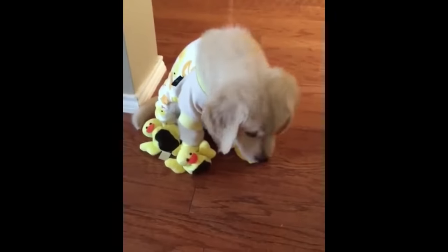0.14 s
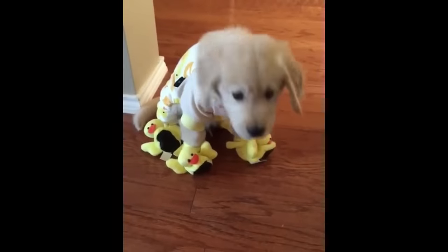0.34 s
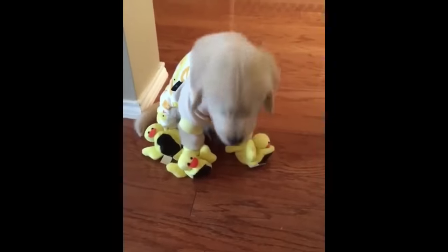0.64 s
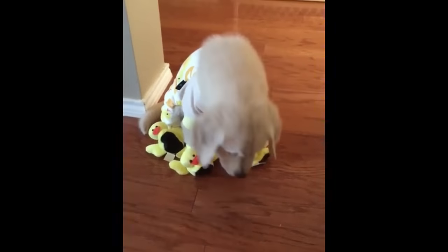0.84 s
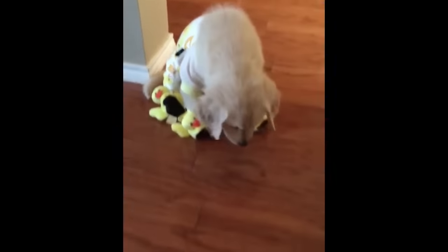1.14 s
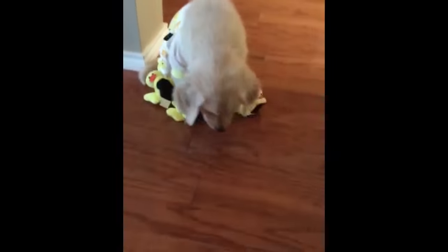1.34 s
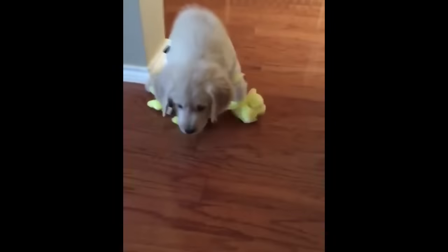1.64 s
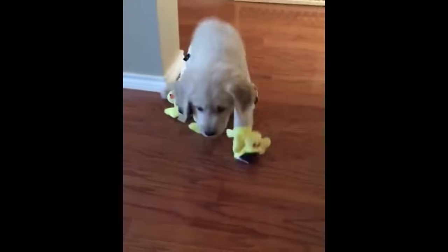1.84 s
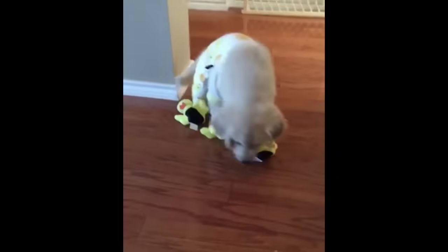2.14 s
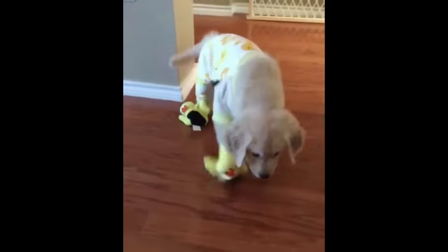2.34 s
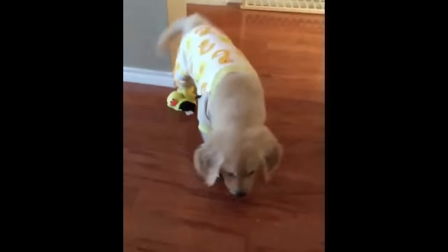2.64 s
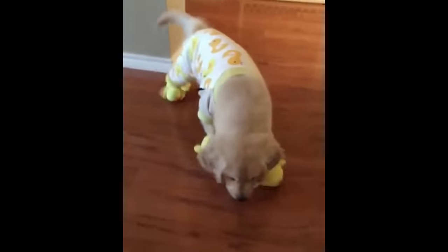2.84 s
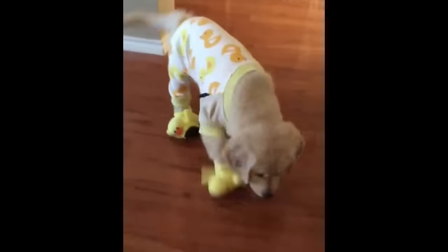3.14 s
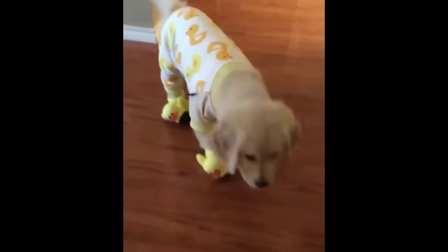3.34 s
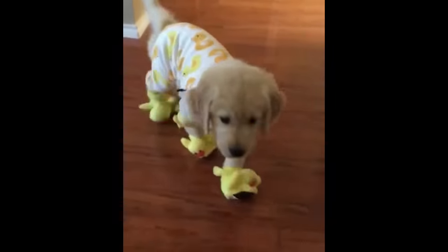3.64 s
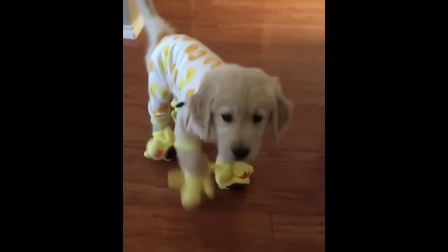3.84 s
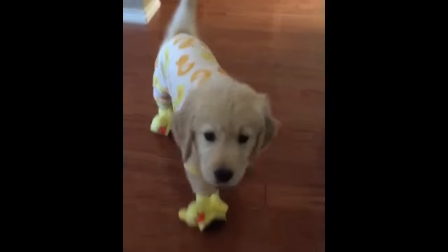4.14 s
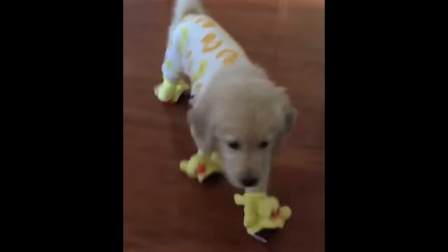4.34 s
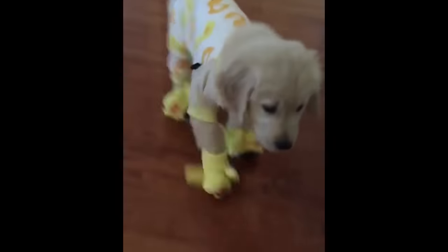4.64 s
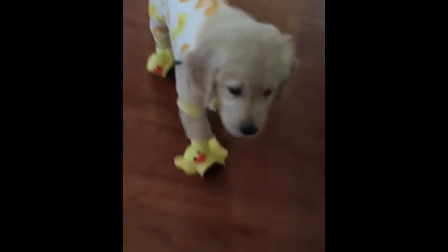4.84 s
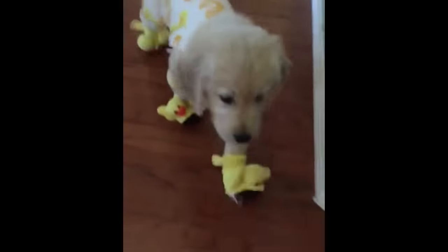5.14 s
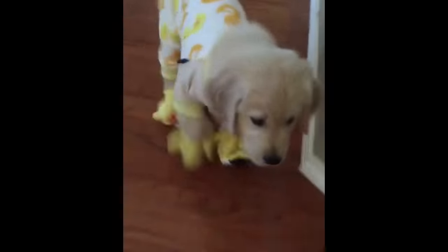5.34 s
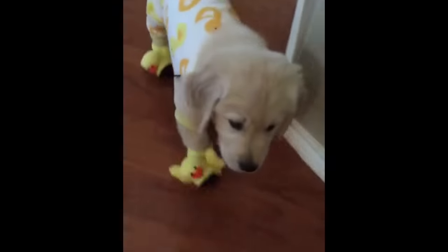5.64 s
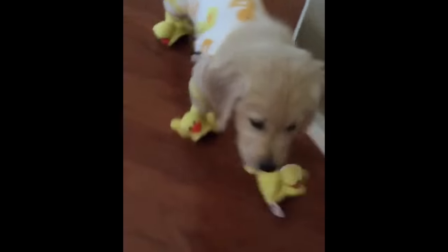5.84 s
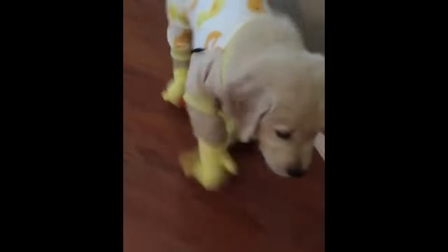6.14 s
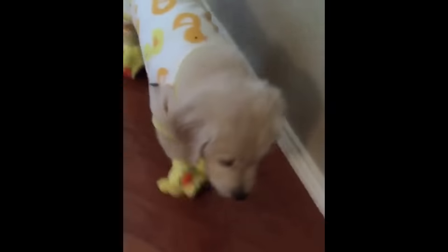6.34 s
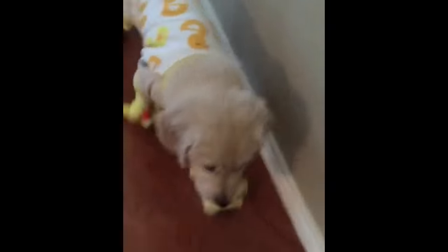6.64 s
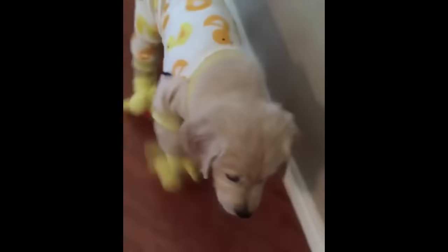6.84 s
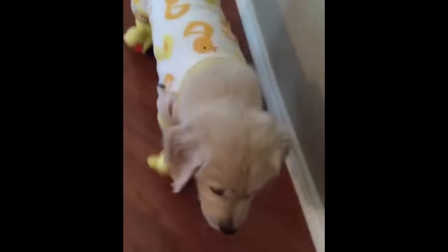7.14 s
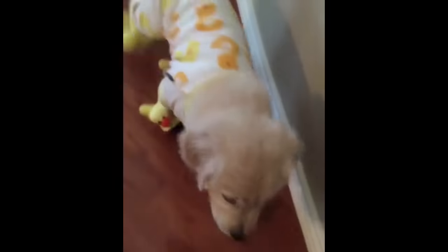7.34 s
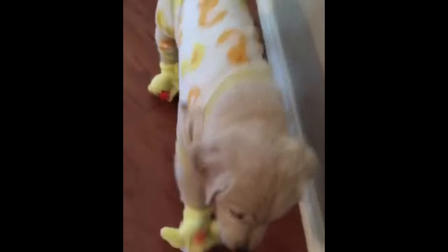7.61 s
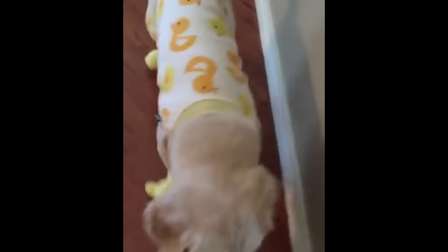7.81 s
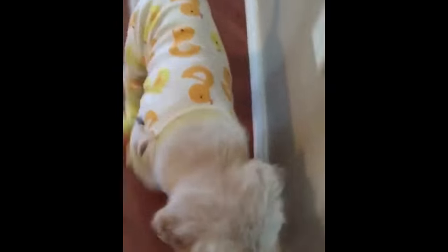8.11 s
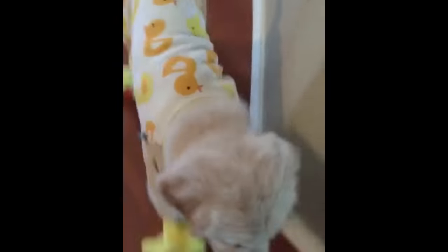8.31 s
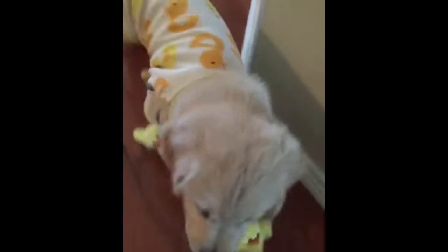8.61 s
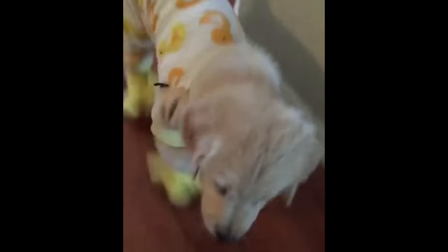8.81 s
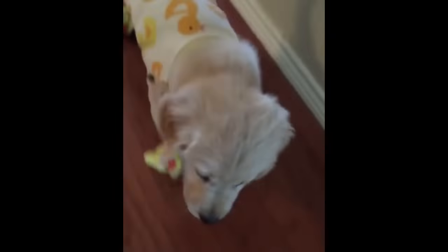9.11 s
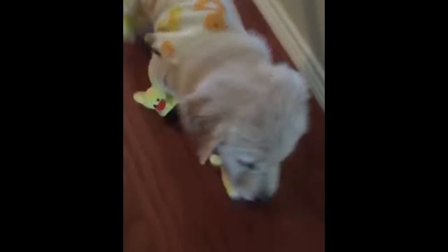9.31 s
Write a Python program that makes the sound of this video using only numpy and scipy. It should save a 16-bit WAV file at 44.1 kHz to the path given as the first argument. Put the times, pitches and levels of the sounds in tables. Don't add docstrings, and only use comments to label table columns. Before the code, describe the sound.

A puppy in soft slippers, close to a handheld microphone in a bare room: first a rapid run of six moist smacks, then a quiet gap, then irregular plush rubs, small dry claw clicks and very faint rubbery chirps on boards. Another dog barks far away, muffled and echoing, two early and two late. Steady low mains hum and a swelling airy boom sit under faint hiss.

```python
import sys
import numpy as np
from scipy import signal
from scipy.fft import rfft, irfft
from scipy.io import wavfile
from scipy.ndimage import uniform_filter1d

SR = 44100
rng = np.random.default_rng(int(sys.argv[2]) if len(sys.argv) > 2 else 0)


def linear_from_db(decibels):
    return 10 ** (np.asarray(decibels, float) / 20)


def inscribe(sig):
    pcm = np.round(np.clip(np.atleast_2d(sig).T, -1, 1) * 32767)
    wavfile.write(sys.argv[1], SR, pcm.astype(np.int16))


N = 417627
ROOM_T60_S, HALL_T60_S = 0.41, 0.65


def unit(x):
    return x / np.sqrt(np.mean(x ** 2))


def noise(n=N):
    return rng.standard_normal(n)


def band(x, lo_hz, hi_hz, order=2):
    edges_hz = [lo_hz, min(hi_hz, .45 * SR)]
    return signal.sosfilt(signal.butter(order, edges_hz, "band", fs=SR, output="sos"), x)


def peak(x, hz, width_hz):
    return band(x, hz - width_hz / 2, hz + width_hz / 2, order=1)


def curves(table, t):
    s, *columns = np.transpose(table)
    return [np.interp(t, s, column) for column in columns]


def walk(rate, n=N):
    k = max(int(SR / rate), 1)
    stairs = np.repeat(noise(n // k + 1), k)
    return unit(uniform_filter1d(uniform_filter1d(stairs, k), k)[:n])


def add(out, s, x):
    i = int(s * SR)
    out[i:i + len(x)] += x[:len(out) - i]


def tail(t60, build_s):
    t = np.arange(int(1.3 * SR)) / SR
    ir = noise(len(t)) * (1 - np.exp(-t / build_s)) * linear_from_db(-60 * t / t60)
    return ir / np.sqrt(np.sum(ir ** 2))


# (time [s], duct rumble level [dB], fridge level [dB])
HUM_LEVELS = [(0.0, -61, -48.5), (1.87, -56.5, -47), (2.08, -53, -50.5), (2.48, -63, -46.5),
              (2.92, -52, -48), (3.14, -54.5, -45.5), (3.72, -49.5, -44), (5.38, -47.5, -47.5),
              (6.38, -45.5, -59), (6.62, -46.5, -54), (7.1, -43.5, -50), (7.44, -47.5, -44.5),
              (8.23, -47.5, -45), (8.36, -59, -51), (8.63, -44, -45), (8.91, -49, -52.5),
              (9.28, -51, -43.5), (9.47, -44, -53.5)]


def hum(blower_mean_db=-54, blower_follows=.7, hand_db=-73):
    t = np.arange(N) / SR
    duct_db, fridge_db = curves(HUM_LEVELS, t)
    blower_db = blower_mean_db + blower_follows * (duct_db - duct_db.mean())

    mains = np.sin(2 * np.pi * 119.8 * t) * linear_from_db(1.5 * walk(9))
    fridge = mains + linear_from_db(-5.5) * unit(band(noise(), 106.7, 123.6))
    boom = np.sin(2 * np.pi * 54.5 * t + 0.63 * walk(3.5)) * linear_from_db(0.5 * walk(3.8))
    duct = boom + linear_from_db(-4.5) * unit(band(noise(), 48, 64))
    blower = band(noise(), 81.9, 98)
    hand = linear_from_db(hand_db + 3.2 * walk(14)) * unit(band(noise(), 110, 350))
    return linear_from_db(duct_db) * unit(duct) + linear_from_db(fridge_db) * unit(fridge) + linear_from_db(blower_db) * unit(blower) + hand


# (frequency [Hz], level [dB per Hz])
AIR_SPECTRUM = [(15, -38), (25, -17), (140, -5.5), (250, -26.5), (761, -34), (2080, -37.5), (6850, -42.5),
                (14000, -46)]


def air(level_db=-64):
    hz, db = np.transpose(AIR_SPECTRUM)
    f = np.maximum(np.arange(N // 2 + 1) * SR / N, 1)
    x = irfft(rfft(noise()) * linear_from_db(np.interp(np.log(f), np.log(hz), db)), N)
    x = x * linear_from_db(1.0 * walk(22))
    return x / np.std(band(x, 200, 14000)) * linear_from_db(level_db)


# (time [s], peak level [dB], ring [Hz], treble level [dB])
CLAW_TICKS = [(.032, -48, 9500, -4), (1.7397, -48.5, 2980, -16), (2.8424, -33, 3728, -1),
              (3.114, -54.5, 5900, -11.5), (3.2122, -39.5, 3731, 0), (3.263, -34, 2320, -4),
              (3.2956, -39, 2040, 0), (3.7278, -32, 5340, -14), (3.853, -43.5, 2771, 8),
              (3.895, -38, 6940, 4), (4.338, -43, 6120, -22), (4.4313, -53, 2200, -18),
              (4.913, -46, 7430, -11), (5.082, -38.5, 4300, 4), (5.3442, -35, 6440, -10),
              (5.8543, -46.5, 2606, -2), (6.1621, -41.5, 3020, -21), (6.6167, -45.5, 4300, -8),
              (6.923, -41, 6800, -19), (6.98, -44.5, 2160, 11), (7.049, -47.5, 7300, -1),
              (7.226, -45, 3300, 1), (7.2784, -49, 2620, -12), (7.5788, -44.5, 7191, -18),
              (7.8333, -34, 3140, -8), (7.8495, -44, 3620, -12), (8.0122, -48, 3630, -10),
              (8.2034, -40.5, 1920, -14), (8.585, -38, 2670, -7), (9.1263, -45.5, 6730, -6)]


def ticks(rise_s=0.0014, t60_s=0.027, t60_scatter=0.15):
    out, t = np.zeros(N), np.arange(int(.06 * SR)) / SR
    for s, db, hz, treble_db in CLAW_TICKS:
        t60 = t60_s * np.exp(t60_scatter * rng.standard_normal())
        crack = noise(len(t)) * (1 - np.exp(-t / rise_s)) * linear_from_db(-60 * t / max(t60, .003))
        knock = unit(peak(crack, hz, 0.24 * hz))
        x = knock + linear_from_db(treble_db) * unit(band(crack, 3300, 11000))
        add(out, s, linear_from_db(db - 3) * x / np.abs(x).max())
    return out


def room(x, step_s=.16):
    out, step = np.zeros(N), int(step_s * SR)
    for i in range(0, N, step):
        ir = band(tail(ROOM_T60_S, build_s=0.0034)[:SR // 2], 270, 9900, order=1)
        add(out, i / SR, signal.fftconvolve(x[i:i + step], ir))
    return out


# (time [s], peak level [dB], cavity [Hz], treble level [dB], bass level [dB])
WET_SMACKS = [
    (0.0848, -21.5, 2830, -11, -15.5),
    (0.2413, -20.5, 3020, -6, -13.5),
    (0.412, -19, 2910, -14, -29.5),
    (0.5807, -21.5, 3150, -18, -10),
    (0.7249, -23.5, 3930, -8.5, -11),
    (0.9009, -17, 3200, -17.5, -20),
]


def smacks(burst_s=0.0051, lead_s=.013, lead_db=-14, drying_db_s=-30, wet_db=-15, dull_t60=0.34):
    out, t = np.zeros(N), np.arange(SR // 2) / SR
    after = np.maximum(t - lead_s, 0)
    release = (after / burst_s + .15) * np.exp(-(after / burst_s) ** 2)
    echo = linear_from_db(wet_db) * (1 - np.exp(-after / .006))
    for s, db, hz, treble_db, bass_db in WET_SMACKS:
        creep = linear_from_db(lead_db + drying_db_s * s) * t / lead_s
        burst = np.where(t < lead_s, creep, release)
        hiss = noise(len(t))
        ragged = linear_from_db(2.7 * walk(600, len(t)))
        ringing = echo * linear_from_db(1.1 * walk(43, len(t)) - 60 * after / ROOM_T60_S)
        pops = hiss * (ragged * burst + ringing)
        crisp = hiss * (burst + echo * linear_from_db(-60 * after / dull_t60))

        cavity = unit(peak(pops, hz, 1100)) + .5 * unit(peak(pops, 3480, 140))
        cavity = cavity + .4 * unit(peak(pops, .93 * hz, 200)) + linear_from_db(-17.0) * unit(peak(pops, 1.85 * hz, 700))
        standing_waves = sum(peak(pops, f, 44) for f in rng.uniform(2000, 6500, size=14))
        treble = unit(band(crisp + .3 * pops, 5100, 15000))
        bass = unit(band(pops, 1200, 2400)) + 1.6 * unit(band(pops, 340, 730))
        x = cavity + linear_from_db(-4.5) * unit(standing_waves) + linear_from_db(treble_db) * treble + linear_from_db(bass_db) * bass
        add(out, s - lead_s, linear_from_db(db) * x / np.abs(x).max())
    return out


# (frequency [Hz], width [Hz], level
# [dB], t60 [s])
HALL_MODES = [(640, 40.2, -4.5, 0.85), (725, 50, -9, 0.27), (1150, 38.4, 0, 0.97), (1338, 31, -4, 0.88),
              (1600, 91, -2, 0.74), (1973, 65, 0.5, 0.82)]


def hall(x, direct_db=-1, diffuse_db=-5):
    ir = linear_from_db(diffuse_db) * tail(HALL_T60_S, build_s=0.018)
    for hz, width, db, t60 in HALL_MODES:
        ir = ir + linear_from_db(db) * peak(tail(min(t60, .78), build_s=.01), hz, max(width, 35))
    ir[0] = linear_from_db(direct_db)
    wet = signal.fftconvolve(x, ir)
    leak = linear_from_db(-7) * band(wet, 330, 410, order=3) + linear_from_db(-30) * band(wet, 2700, 4500, order=3)
    return band(wet, 440, 2200, order=9) + leak


# (time [s], pitch [Hz], effort level [dB], muzzle opening [0-1])
FAR_BARKS = [
    [(.503, 472.5, -35.5, 0.7), (.545, 539, -23.5, 0.68), (.58, 579, -21.5, 0.41), (.602, 639, -17, .08),
     (.635, 640, -23, 0.11), (.66, 639.7, -25.5, 0.03), (.685, 604, -34, .03)],
    [(1.155, 524, -41, 0.27), (1.18, 534, -29, 0.65), (1.215, 562.3, -21, 0.57),
     (1.242, 630.5, -18.5, 0.02), (1.285, 614, -31, 0.27), (1.32, 552, -30, 0)],
    [(8.14, 815, -40.5, 0.24), (8.16, 773.6, -29.5, 0.24), (8.187, 725, -19.5, 0.14),
     (8.212, 608, -23, 0.54), (8.243, 660, -20, 0.13), (8.27, 684, -31, 0), (8.3, 668, -40, 0.2)],
    [(8.625, 447.5, -41.5, 0.05), (8.652, 480, -31.5, 0.56), (8.678, 525.6, -26, 0.68),
     (8.702, 600.3, -22.5, 0.27), (8.745, 604, -24.5, 0.13), (8.79, 581, -45, .3)],
]
HOARSENESS = [.9, 1.0, 1.3, 1.3]
# (frequency [Hz], width [Hz])
MUZZLE_RINGS = [(1150, 505), (1600, 500), (2100, 1000)]


def barks(jitter=.025, shimmer_db=1.5, settle_s=.06, breath=.4, spread_db=35.5, mouth_db=-2.5, yap_db=-0.5):
    out = np.zeros(N)
    for table, hoarse in zip(FAR_BARKS, HOARSENESS):
        t = np.arange(table[0][0], table[-1][0], 1 / SR)
        n = len(t)
        hz, effort_db, opening = curves(table, t)
        rough = breath * hoarse ** 2 + hoarse * np.exp(-(t - t[0]) / settle_s)
        phase = np.cumsum(hz * (1 + jitter * (.5 + rough) * walk(180, n))) / SR

        folds = sum(np.cos(2 * np.pi * k * phase) for k in range(2, 8))
        folds = folds + 3.5 * rough * noise(n) * (1 + np.cos(2 * np.pi * phase))
        low, middle, high = (unit(peak(peak(folds, f, w), f, w)) for f, w in MUZZLE_RINGS)
        chest = np.sin(2 * np.pi * uniform_filter1d(phase, size=300, mode="nearest"))
        chest = chest + 0.48 * rough * unit(band(noise(n), 560, 950))

        voice = linear_from_db(effort_db + 0.0072 - spread_db * opening ** 2) * chest
        voice = voice + linear_from_db(effort_db + mouth_db - spread_db * (opening - .5) ** 2) * low
        yap = middle + linear_from_db(-7.5) * high
        voice = voice + linear_from_db(effort_db + yap_db - spread_db * (opening - 1) ** 2) * yap
        voice = voice * linear_from_db(shimmer_db * walk(86.4, n)) * signal.windows.tukey(n, .1)
        add(out, t[0], hall(voice))
    return out


# (loudest time [s], level [dB], rise [s], fade [s], top share [dB])
SLIPPER_STEPS = [(1.24, -57.5, 0.33, 0.17, -6.5), (1.75, -57, 0.024, 0.1, 0.5),
                 (2.12, -61, 0.066, 0.12, -4.5), (2.846, -48.5, 0.029, 0.1, -3.5),
                 (3.22, -63.5, .04, .09, -3), (3.285, -48, 0.049, .06, -3), (3.73, -55.5, 0.022, .13, -3.5),
                 (3.905, -61, 0.025, .03, 5.5), (4.355, -54.5, 0.03, 0.039, 0.5),
                 (4.93, -58, .04, 0.18, 0.5), (5.085, -56.5, 0.013, 0.063, 1),
                 (5.355, -50.5, 0.046, 0.11, -4), (5.88, -57, 0.063, 0.087, -1),
                 (6.345, -56, 0.085, 0.17, -5), (6.62, -57.5, .025, 0.044, -0.5),
                 (7.3, -53.5, 0.071, 0.067, -3), (7.45, -56.5, 0.1, 0.11, -0.5),
                 (7.84, -55, 0.034, 0.062, -8.5), (7.955, -59, 0.039, 0.11, -3),
                 (8.58, -57, .02, 0.063, -10.5), (8.75, -60, .2, 0.062, -4.5),
                 (9.26, -56, 0.062, .15, -2.5)]
# (loudest time [s], level [dB], fade [s])
PLUSH_DRAGS = [(2.01, -70, .08), (3.0, -67, .25), (3.13, -63.5, 0.17), (3.39, -71.5, 0.26),
               (4.17, -69.5, 0.29), (4.44, -67.5, 0.34), (4.69, -66, 0.078), (4.83, -68.5, .12),
               (5.289, -62, .1), (5.46, -72, 0.21), (5.62, -66, 0.081), (6.181, -63.5, 0.24),
               (6.25, -64, .08), (6.941, -62, 0.29), (7.18, -63, 0.098), (7.58, -79.5, .15),
               (7.7, -68, 0.22), (8.071, -64, 0.26), (8.19, -63, 0.23), (8.51, -61, .08),
               (8.909, -62.5, 0.24), (9.45, -61, .2)]


def rubbing(drag_rise_share=0.57, drag_top_db=0.2, rustle_db=-90.5):
    t = np.arange(0, N, 64) / SR
    drags = [(s, db, drag_rise_share * fade_s, fade_s, drag_top_db) for s, db, fade_s in PLUSH_DRAGS]
    body, top = np.zeros(len(t)), np.zeros(len(t))
    for s, db, rise_s, fade_s, top_db in SLIPPER_STEPS + drags:
        swell = linear_from_db(db - 20 * np.maximum((s - t) / rise_s, (t - s) / fade_s)) ** 2
        body += swell
        top += swell * linear_from_db(top_db) ** 2
    return [np.interp(np.arange(N) / SR, t, np.sqrt(p + linear_from_db(rustle_db) ** 2)) for p in (body, top)]


def flecks(x, count=18, width_hz=70, flicker_db=5):
    rings_hz = np.geomspace(1900, 12500, count)
    return unit(sum(peak(x, hz, width_hz) * linear_from_db(flicker_db * walk(25)) for hz in rings_hz))


def scuff(grain_db=0.0, grains_per_s=1200, low_db=-6, fleck_db=-7):
    body, top = rubbing()
    sizes = linear_from_db(grain_db * np.minimum(rng.exponential(size=N), 4))
    grains = (rng.random(N) < grains_per_s / SR) * sizes * noise()
    rub = (unit(grains) + .7 * noise()) * linear_from_db(2.5 * walk(60))

    def patch(lo_hz, hi_hz):
        return unit(band(rub, lo_hz, hi_hz) * linear_from_db(2.2 * walk(30)))

    mix = linear_from_db(low_db) * patch(1300, 3500) + 0.54 * patch(2700, 4500)
    mix = mix + 0.63 * patch(4750, 6100) + .25 * patch(7160, 7500)
    mix = mix + linear_from_db(fleck_db) * flecks(rub)
    return mix * body + patch(7000, 15000) * top


# (time [s], pitch [Hz], length [s], level [dB])
SQUEAKS = [(1.993, 1393, 0.049, -65.5), (1.996, 2550, 0.018, -63.5), (2.111, 2530, 0.05, -64.5),
           (2.496, 1790, 0.019, -63.5), (3.279, 642, 0.062, -60), (3.86, 2920, 0.038, -60),
           (4.623, 2750, 0.05, -64.5), (4.678, 3530, 0.028, -65), (4.89, 643, 0.02, -73),
           (4.925, 2850, 0.062, -64), (4.949, 1934, 0.052, -62.5), (5.014, 2680, 0.027, -61),
           (5.148, 2070, 0.082, -70.5), (5.246, 2000, 0.094, -60.5), (5.339, 465, 0.02, -58),
           (5.344, 3280, 0.037, -56), (5.369, 2434, 0.037, -59), (5.682, 2000, .04, -69.5),
           (6.619, 610, 0.039, -70), (6.92, 643, 0.019, -59), (7.046, 1600, 0.015, -63),
           (7.272, 7250, 0.09, -66), (7.168, 498, 0.045, -62), (7.955, 1950, 0.062, -65),
           (7.284, 1150, 0.036, -63), (7.289, 1950, 0.023, -62), (7.292, 2580, 0.023, -54.5),
           (8.118, 7140, .018, -60), (9.25, 2100, 0.044, -60.5), (9.439, 2100, 0.045, -61)]


def chirps(waver=.012):
    out = np.zeros(N)
    for s, hz, length_s, db in SQUEAKS:
        n = int(length_s * SR)
        tone = np.sin(2 * np.pi * np.cumsum(hz * (1 + waver * walk(152, n))) / SR)
        tone = tone + .8 * unit(peak(noise(n), hz, .08 * hz))
        add(out, s, linear_from_db(db + 1.4 * walk(256, n)) * tone * np.hanning(n))
    return out


def scene():
    near = ticks() + .3 * chirps()
    close = smacks() + near + 0.9 * chirps() + linear_from_db(-5) * room(near) + scuff()
    return (close + barks() + hum() + air())[None]


def low_pass(x):
    return signal.sosfilt(signal.butter(12, 14910, fs=SR, output="sos"), x)


def record(dry):
    top_cut = signal.ellip(8, .2, 60, 14000, fs=SR, output="sos")
    dry = dry - 0.52 * peak(dry, 10450, 500)
    return low_pass(signal.sosfilt(top_cut, dry))


dry = scene()
out = record(dry)
inscribe(out)
```